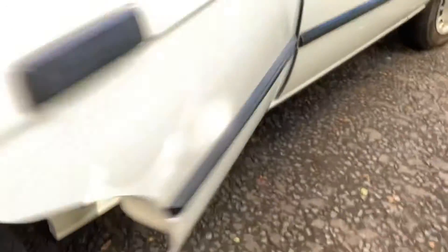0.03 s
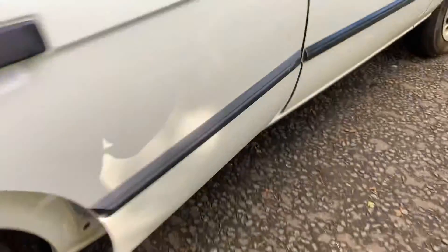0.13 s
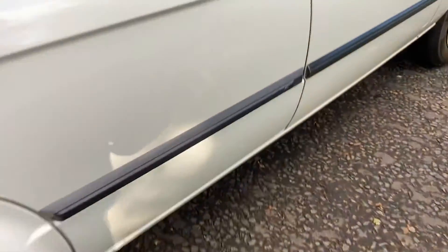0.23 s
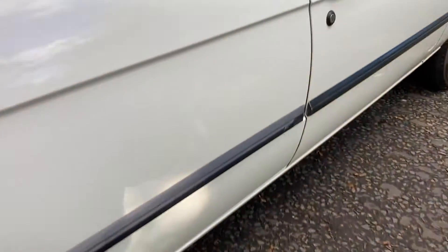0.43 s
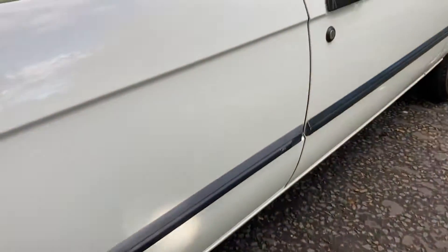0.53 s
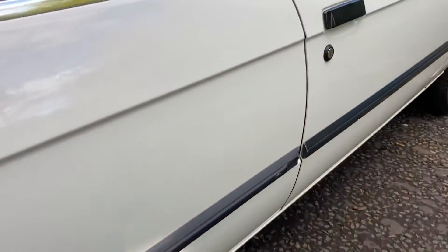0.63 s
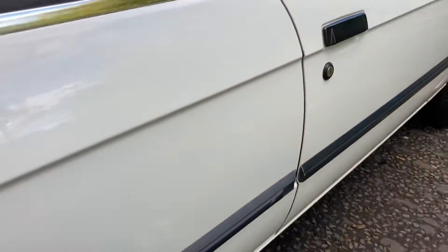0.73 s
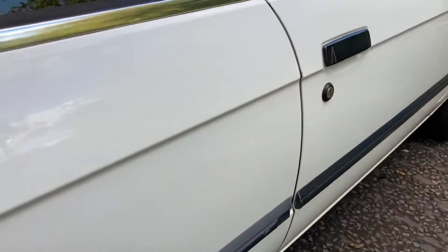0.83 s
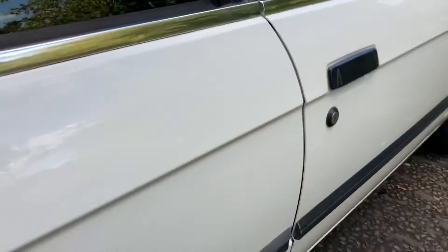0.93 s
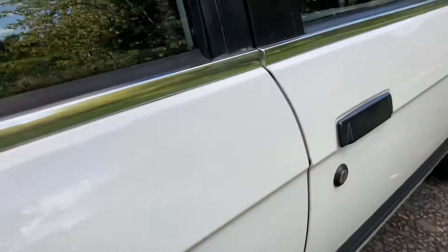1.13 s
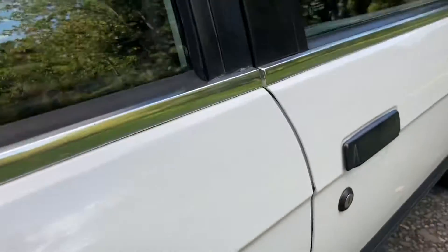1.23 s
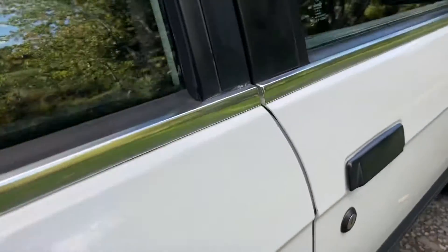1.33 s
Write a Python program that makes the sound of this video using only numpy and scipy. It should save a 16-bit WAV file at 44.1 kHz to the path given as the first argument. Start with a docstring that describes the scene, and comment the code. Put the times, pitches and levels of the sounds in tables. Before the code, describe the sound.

A car door slams shut outdoors with a solid thunk, then small latch clicks and knocks follow

```python
"""A car door slams outdoors, about a metre away, over a low rumble and hiss of shaped noise that never stops.
First come faint knocks of gliding sines, ticks of struck metal modes, and rustle and thrum of banded noise.
At 0.2 s latch and edge blows excite panel modes and a noisy rattle, then squeezed air makes the cabin boom.
A tail of decaying noise bands dies away; knocks, ticks and rustle follow as the mechanism settles.
Two microphone ports hear the door and its mechanism with a small lag, the air and rustle diffusely."""
import sys
import numpy as np
from scipy import signal
from scipy.fft import rfft, irfft
from scipy.io import wavfile
from scipy.ndimage import uniform_filter1d

SR = 44100
rng = np.random.default_rng(int(sys.argv[2]) if len(sys.argv) > 2 else 0)


def transcribe(signal):
    """Save signal, clipped to [-1, 1], as a 16-bit WAV file at the path in sys.argv[1]."""
    frames = np.atleast_2d(signal).T
    limited = np.clip(frames, -1, 1)
    pcm = np.round(limited * 32767).astype(np.int16)
    wavfile.write(sys.argv[1], SR, pcm)


N = 61739
T = np.arange(N) / SR  # time in s
F = np.fft.rfftfreq(N, 1 / SR)  # frequency in Hz

# Latch and edge blows on the door panel:
# start_s, panel_level_db, rattle_level_db, rattle_t60_s, contact_s
BLOWS = [(0.203, -22, -55.5, 0.059, 0.00044), (.2106, -3.5, -34, 0.069, 0.00029),
         (0.2153, -11, -32, 0.055, 0.00043), (0.221, -11.5, -15.5, 0.059, .0008),
         (0.2273, -9, -18.5, 0.068, 0.00062), (.2325, -9.5, -46.5, .04, 0.00054),
         (0.2389, -9, -70, 0.024, 0.00063), (0.2494, -21, -14, 0.04, .0006),
         (0.2527, -13, -35, 0.076, 0.00098)]
# Level of the left port over the right for sound from the door: frequency_hz, difference_db
DOOR_PAN = [(60, -2.5), (110, 3), (200, 2), (380, 2.5), (700, 7), (1290, 6.5), (2380, 2.5), (4400, 3),
            (8120, 11.5), (15000, 15.5)]
DOOR_LAG_S = 0.00031  # right port late


def undb(db):
    """Amplitude ratio: a level in dB is 20 times its base-10 logarithm."""
    return 10 ** (np.asarray(db) / 20)


def over_hz(table):
    """Spectrum envelope: values interpolated linearly over log frequency."""
    hz, value = np.array(table, float).T
    return np.interp(np.log(F + 1), np.log(hz), value)


def noise(gain):
    """Filtered white noise: a gain per frequency colours it; the rms is set to 1."""
    x = irfft(rfft(rng.standard_normal(N)) * gain, N)
    return x / x.std()


def band(lo_hz, hi_hz):
    """Band-pass response: gain per frequency with soft edges."""
    return 1 / np.sqrt((1 + (lo_hz / (F + 1)) ** 6) * (1 + (F / hi_hz) ** 6))


def walk(rate_hz):
    """Random modulation: levels held for one period, then smoothed, with spread 1."""
    held = int(SR / rate_hz)
    x = uniform_filter1d(rng.standard_normal(N)[np.arange(N) // held], held)
    return x / x.std()


def fade(start, t60):
    """Exponential decay: zero before the start, then 60 dB lost in every t60."""
    return (T >= start) * np.exp(-np.log(1000) * np.maximum(T - start, 0) / t60)


def push(start, length):
    """Contact impulse: a half-sine force of area 1, whose length limits the treble it excites."""
    x = np.sin(np.pi * np.clip((T - start) / length, 0, 1))
    return x / x.sum()


def ring(force, modes, step=-1):
    """Modal superposition: a force drives decaying sines, each mode's weight scaled by step over the last."""
    body = 0
    for k, (hz, db, t60) in enumerate(modes):
        body = body + step ** k * undb(db) * fade(0, t60) * np.sin(2 * np.pi * hz * T)
    return signal.fftconvolve(force, body)[:N]


def ports(left, right, lag_s, pan):
    """Interaural-type cues: half the level and time difference goes to each port; positive lag is right late."""
    half = undb(over_hz(pan) / 2) * np.exp(1j * np.pi * F * lag_s)
    return np.array([irfft(rfft(left) * half, N), irfft(rfft(right) / half, N)])


def diffuse(gain):
    """Diffuse-field coherence: noise alike at both ports in the bass, unrelated above."""
    alike_hz = 520
    apart = 1 / np.sqrt(1 + (alike_hz / (F + 1)) ** 2)
    mid, side = rng.standard_normal((2, N))
    pair = np.array([irfft((rfft(mid) + way * apart * rfft(side)) * gain, N) for way in (1, -1)])
    return pair / pair.std()


def air():
    """Broadband ambient noise: outdoor rumble and hiss, diffuse and slowly modulated in level."""
    # Noise spectrum: frequency_hz, density_db (per Hz, relative)
    air_spectrum = [(25, -23), (50, 5.5), (90, -0.5), (125, -4), (250, -12), (500, -19), (800, -20.5),
                    (1050, -23), (1400, -29.5), (2200, -35), (4000, -48), (8000, -60), (16000, -59.5)]
    # Left port over right: frequency_hz, difference_db
    air_pan = [(60, -2.5), (110, 0.5), (200, 1), (380, -0.5), (700, 0), (1290, 2), (2380, 2), (4400, 3),
               (8120, 0.0), (15000, 9)]
    level_db, swell_db = -46, 1.2
    return ports(*diffuse(undb(over_hz(air_spectrum))), 0, air_pan) * undb(level_db + swell_db * walk(6.15))


def rustle():
    """Amplitude-modulated noise: three diffuse bands follow level curves roughened by random grain."""
    # Level curves: time_s, middle_db, treble_db, top_db
    rustle_levels = np.array([(0, -58, -63, -78), (.02, -68.5, -65, -65), (.05, -65.5, -63, -64),
                              (.062, -47.5, -66.5, -69.5), (0.072, -55.5, -76, -66),
                              (0.077, -56, -66, -52.5), (.089, -81, -92, -55), (.095, -57.5, -75, -69),
                              (.15, -76, -85, -84), (0.197, -59, -99, -90), (0.211, -35, -99.5, -101),
                              (.6, -85, -95, -95.5), (.615, -72.5, -78.5, -73), (.69, -80, -84, -71),
                              (.71, -95.5, -94, -92), (.745, -59, -80, -80.5), (.77, -87, -87, -89),
                              (1.09, -65.5, -76, -90), (1.12, -68, -71.5, -74), (1.18, -92.5, -91.5, -99),
                              (1.4, -66, -93, -96.5)])
    # Bands of middle, treble and top: low_hz, high_hz
    rustle_bands = [(1200, 2630), (5500, 10300), (10000, 21400)]
    grain_db = 2.5
    out = 0
    for curve_db, edges_hz in zip(rustle_levels.T[1:], rustle_bands):
        level_db = np.interp(T, rustle_levels[:, 0], curve_db) + grain_db * walk(500)
        out = out + undb(level_db) * diffuse(band(*edges_hz))
    return out


def thrum():
    """Low-mid noise under a level envelope, strong while the door swings, arriving from the door."""
    # Level curve: time_s, level_db
    thrum_levels = np.array([(0, -53), (.05, -61), (0.063, -43.5), (.12, -45.5), (0.202, -40.5),
                             (.21, -71.5), (.85, -82), (.92, -56.5), (1.101, -52), (1.25, -52), (1.4, -53)])
    low_noise = undb(np.interp(T, thrum_levels[:, 0], thrum_levels[:, 1])) * noise(band(97, 570))
    return ports(low_noise, low_noise, DOOR_LAG_S, DOOR_PAN)


def knocks():
    """Damped impact as a frequency glide: a few cycles over a low body, with a faint noisy edge."""
    # Dull knocks: start_s, level_db, start_pitch_hz, target_pitch_hz (approached, not reached), length_s
    knock_list = [(0.067, -32, 518, 390, 0.015), (.113, -39.5, 693, 520, 0.027),
                  (0.131, -39, 500, 404.4, 0.0089), (0.186, -42.5, 510, 467, 0.0071),
                  (0.901, -25.5, 741, 308, 0.0073), (.907, -22, 597, 600, 0.0065),
                  (0.916, -37.5, 590, 600, 0.017), (.927, -31.5, 456, 450, .005),
                  (.9305, -25.5, 669, 560, 0.0084), (0.9863, -28.5, 740, 580, 0.012),
                  (1.027, -25.5, 723, 357, 0.0066), (1.0346, -28.5, 625, 592, 0.009),
                  (1.055, -35.5, 526, 300, 0.0132), (1.147, -40.5, 656, 250, 0.018),
                  (1.248, -32.5, 324, 262.5, 0.01), (1.262, -35, 650, 334, 0.011),
                  (1.351, -42, 402, 313, 0.011)]
    rise_power = 0.42  # below 1 puts the peak early in the knock
    body_hz, body_db, edge_db = 291, -7.5, -25.5
    out, edge = 0, noise(band(900, 1730))
    for start, db, start_hz, target_hz, length in knock_list:
        u = np.clip((T - start) / length, 0, 1)
        shape = np.sin(np.pi * u ** rise_power)
        # integral of a pitch that nears its target exponentially
        cycles = length * (target_hz * u + (start_hz - target_hz) * (1 - np.exp(-2 * u)) / 2)
        glide = np.sin(2 * np.pi * cycles)
        body = undb(body_db) * np.sin(2 * np.pi * body_hz * length * u)
        out = out + undb(db) * shape * (glide - body + undb(edge_db) * edge)
    return out


def ticks():
    """Impulse response of small metal modes, plus a noise crack with a fast and a slow decay."""
    # Ticks: start_s, ring_level_db (relative force), crack_level_db
    tick_list = [(0.055, -67, -56), (0.0644, -66, -60), (0.0998, -60, -46), (0.612, -74.5, -61),
                 (0.7492, -64, -63), (0.9049, -34, -47.5), (.9285, -35.5, -46), (1.0322, -41, -48),
                 (1.079, -69, -67), (1.0979, -54, -48.5), (1.106, -67.5, -66), (1.166, -70, -63),
                 (1.348, -69, -59.5)]
    # Metal modes: frequency_hz, level_db (relative), t60_s
    tick_modes = [(3850, -2, .008), (4650, -22, .07), (6500, -13, .012), (8000, -3, .007), (7990, -20, .08),
                  (8090, -27, .07), (10400, -9, .01), (12900, -7, .006)]
    crack_t60_s, tail_t60_s, tail_db = 0.0063, 0.082, -15.5
    force, crack = 0, 0
    for start, ring_db, crack_db in tick_list:
        force = force + undb(ring_db) * push(start, 0.00006)
        decay = fade(start, crack_t60_s) + undb(tail_db) * fade(start, tail_t60_s)
        crack = crack + undb(crack_db) * decay
    return ring(force, tick_modes) / 2 + noise(band(1200, 15800)) * crack


def mechanism():
    """Common source position: knocks and ticks share one lag and level difference, left port late."""
    # Left port over right: frequency_hz, difference_db
    knock_pan = [(60, -4), (110, -7.5), (200, -2), (380, -0.5), (700, 0.5), (1290, 7.5), (2380, 8),
                 (4400, 10), (8120, 4), (15000, -8)]
    out = knocks() + ticks()
    return ports(out, out, -0.00027, knock_pan)


def tail():
    """Frequency-dependent decay: the slam dies away in body and surroundings as diffuse octave bands."""
    # Octave bands: centre_hz, level_db (before rise and decay), t60_s
    tail_bands = [(45.6, -37, 1.52), (83.4, -31.5, 1.72), (180, -34.5, .4), (362, -18.5, 0.24),
                  (710, -30.5, 0.2294), (1000, -57, 0.53), (2000, -40, .17), (1470, -46, 0.32),
                  (2670, -49.5, .4), (5550, -44.5, 0.16), (11070, -53.5, .45)]
    start_s, rise_s = 0.23, 0.0081
    rise = 1 - np.exp(-np.maximum(T - start_s, 0) / rise_s)
    out = 0
    for hz, db, t60 in tail_bands:
        octave = diffuse(band(hz / np.sqrt(2), hz * np.sqrt(2)))
        out = out + undb(db) * rise * fade(start_s, t60) * octave
    return out


def cabin():
    """Cavity resonance: the seal squeezes the cabin air, the door springs back, and the air modes boom."""
    # Pushes on the air: start_s, level_db (relative force), direction (signed factor), length_s
    push_list = [(.2425, -10, 0.71, 0.0048), (0.2492, -7.5, -0.86, 0.0054), (0.2571, -6, 0.89, 0.0034),
                 (0.2644, -9.5, -0.8, 0.0033), (0.269, -13.5, 1, 0.0018)]
    # Air modes: frequency_hz, level_db (relative), t60_s
    cabin_modes = [(37.4, 0, 0.44), (56.5, -1.5, 0.17), (73.54, -2.5, 0.25), (110.7, 5.5, 0.16),
                   (133.5, 2.5, 0.19), (209.3, -4.5, .2)]
    force = sum(way * undb(db) * push(start, length) for start, db, way, length in push_list)
    return ring(force, cabin_modes, step=0.97) / 2  # all modes start the same way


def rattle():
    """Partly coherent noise bursts: each blow sets off a decaying, grainy rattle, one signal per port."""
    # Noise spectrum: frequency_hz, density_db (per Hz, relative)
    rattle_spectrum = [(700, 3.5), (1200, -5.5), (2200, -3.5), (3000, -9.5), (4200, -7.5), (5700, -19),
                       (7100, -14.5), (9500, -18), (12000, -22), (16000, -32.5)]
    grain_db, unrelated = 2.5, 0.98  # unrelated: share of power not common to the ports
    gain = undb(over_hz(rattle_spectrum))
    shape = sum(undb(db) * fade(start, t60) for start, _, db, t60, _ in BLOWS)
    shape = shape * undb(grain_db * walk(900))
    common = np.sqrt(1 - unrelated) * noise(gain)
    return [shape * (common + np.sqrt(unrelated) * noise(gain)) for _ in range(2)]


def panel():
    """Modal response of a struck plate: neighbouring panel modes swing in opposite directions."""
    # Panel modes: frequency_hz, level_db (relative), t60_s
    panel_modes = [(185, -11.5, 0.16), (292.8, -1, 0.045), (383.4, 0.5, 0.11), (495, -7.5, 0.053),
                   (570, -2, 0.056), (698.8, -2.5, 0.15), (869.6, 3.5, 0.054), (1088, -9, 0.047),
                   (1360, -4.5, 0.029)]
    force = sum(undb(db) * push(start, contact) for start, db, _, _, contact in BLOWS)
    return ring(force, panel_modes) / 2


def door():
    """Superposition of the slam: panel and boom alike at both ports, rattle mostly not, then the tail."""
    solid = panel() + cabin()
    left_rattle, right_rattle = rattle()
    return ports(solid + left_rattle, solid + right_rattle, DOOR_LAG_S, DOOR_PAN) + tail()


def scene():
    """Linear superposition of all sources at the two ports."""
    return air() + rustle() + thrum() + mechanism() + door()


def record(dry):
    """Saturation and filtering: peaks round off, the left port supplies both trebles, the top is cut."""
    headroom, shared_hz, shared_lag_s, top_hz = 1.7, 6500, 0.000219, 16000
    left, right = rfft(headroom * np.tanh(dry / headroom), axis=1)
    shared = 1 / (1 + (shared_hz / (F + 1)) ** 16)
    # the shared treble is inverted and early on the right
    left_early = left * np.exp(2j * np.pi * F * shared_lag_s)
    right = np.sqrt(1 - shared) * right - np.sqrt(shared) * left_early
    both = irfft(np.array([left, right]), N, axis=1)
    return signal.sosfilt(signal.ellip(10, 0.2, 80, top_hz, fs=SR, output="sos"), both)


dry = scene()
out = record(dry)
transcribe(out)
```